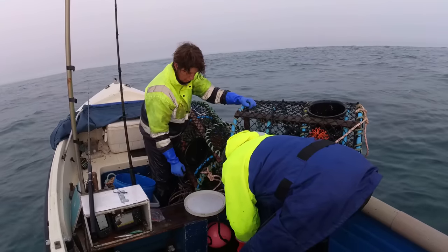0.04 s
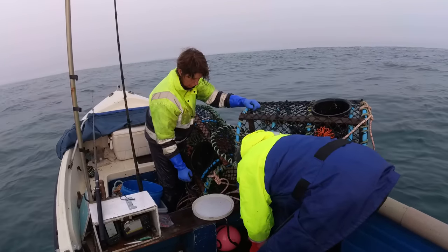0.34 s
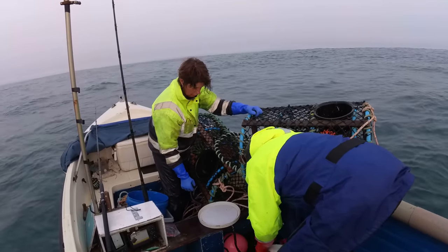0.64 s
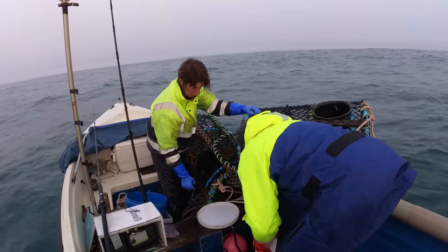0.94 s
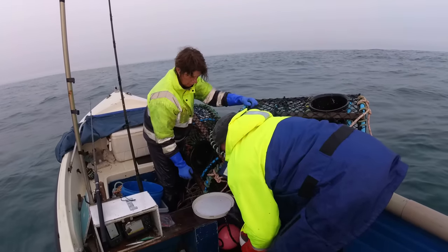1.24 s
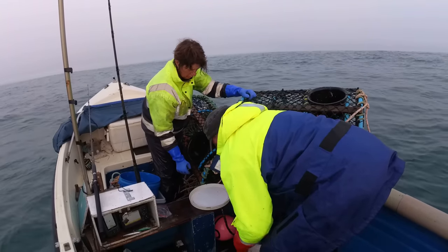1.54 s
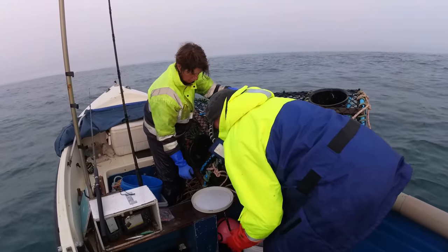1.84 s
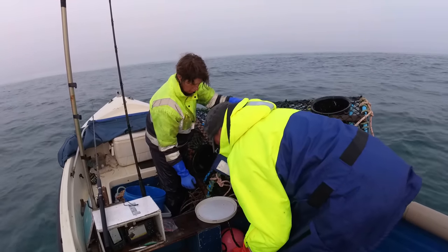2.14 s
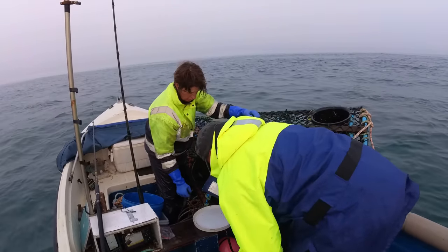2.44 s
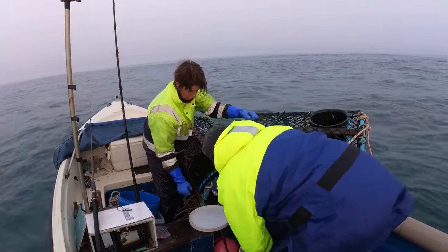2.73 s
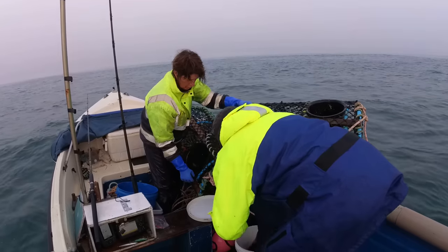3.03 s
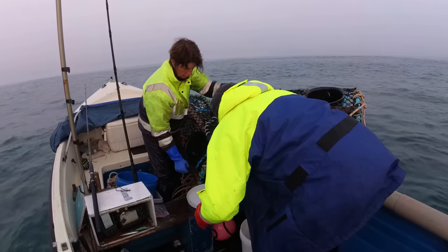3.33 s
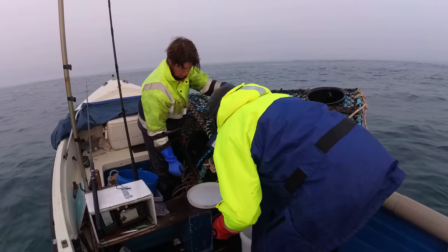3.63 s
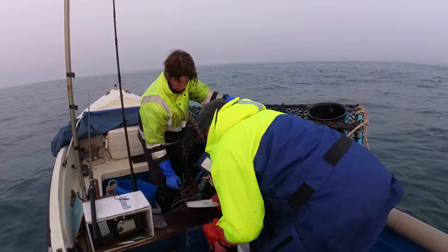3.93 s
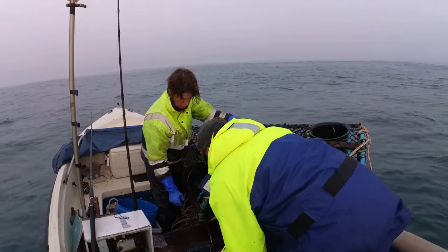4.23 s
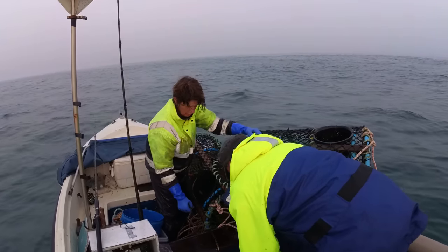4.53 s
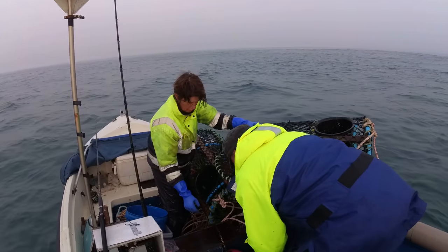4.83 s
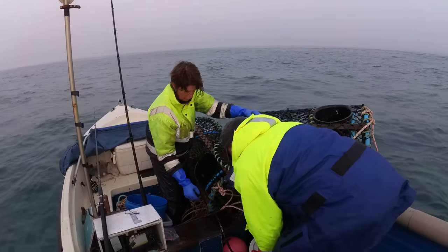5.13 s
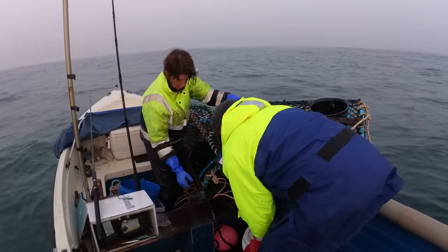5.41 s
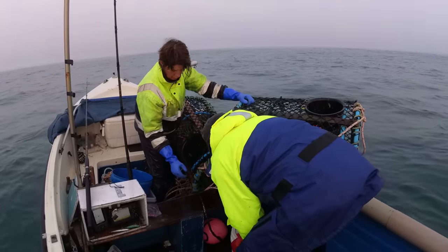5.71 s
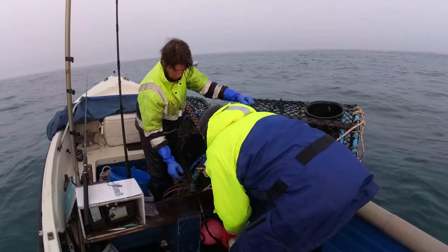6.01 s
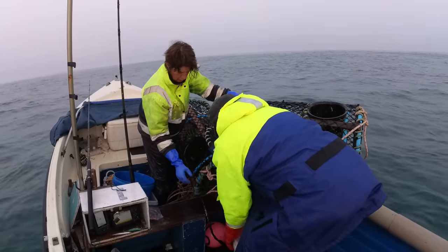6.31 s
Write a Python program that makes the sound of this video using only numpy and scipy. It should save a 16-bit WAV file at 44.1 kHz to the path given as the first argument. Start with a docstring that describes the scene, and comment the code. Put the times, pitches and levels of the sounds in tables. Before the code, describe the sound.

A small boat's hull rumbles low and steady throughout, with soft lapping water, a faintly jiggling fitting and a fine, chirring hiss on the right. A few tiny sharp snaps sound close on the right at the start and recur now and then. From about 0.6 to 1.3 seconds, lobster pots and gear are shifted, knocking and rattling while the hollow deck thumps beneath. A lull follows with scattered clinks and short clear plinks. Oilskins rustle briefly near 2.7 seconds and again near 3.9, with a few lighter knocks and clinks between, just after 3 seconds. From about 4.4 seconds until the end, a little past 6, the gear scrapes and lands in its heaviest run of blows, strongest near 4.5, 5.1 and 5.9 seconds, each with a dull deck boom. Low wind gusts buffet the microphone, growing somewhat in the second half.

```python
"""A small boat lies at sea by a stack of lobster pots: from the start the hull rumbles, water laps, a
fitting jiggles and a fine hiss chirrs on the right, where sharp snaps sound. Near one second, as wind
gusts rise, gear is shifted: impact and friction excite its modes, and the hollow deck booms beneath.
In the lull, clear plinks ring out and oilskins rustle; a few more knocks follow at three seconds.
From about 4.4 seconds to the end the gear scrapes and lands in its heaviest run of blows."""
import sys
import numpy as np
from scipy import signal
from scipy.fft import rfft, irfft, next_fast_len
from scipy.io import wavfile
from scipy.ndimage import map_coordinates

SR = 44100
rng = np.random.default_rng(int(sys.argv[2]) if len(sys.argv) > 2 else 0)


def pcm_store(signal):
    """Save signal as 16-bit PCM."""
    levels = np.round(np.clip(np.atleast_2d(signal), -1, 1) * 32767)
    wavfile.write(sys.argv[1], SR, levels.astype(np.int16).T)


N = 280476
TIME = np.arange(N) / SR

# Gear set down or shoved. Each row: start and contact length in seconds, levels of body, clack, crack
# and deck boom in dB, then the boom's centre, the piece's low note and its high ping in Hz.
KNOCKS = [(0.637, .012, -25.5, -30, -39, 1.5, 130, 586, 2420),
          (.829, 0.012, -31.5, -52, -46, -4, 151, 630, 1630),
          (.902, 0.0094, -20.5, -29.5, -26, -1.5, 128, 703, 2600),
          (1.079, 0.032, -20.5, -20.5, -28, -32, 150, 800, 2080),
          (1.11, 0.016, -20, -18.5, -27.5, -26, 151, 1140, 2420),
          (1.238, .0055, -24, -34, -48, -27, 149, 790, 2010),
          (1.25, 0.015, -22, -21, -27.5, -22, 150, 660, 2380),
          (3.107, 0.012, -31, -32.5, -46, -2, 141.3, 735, 2310),
          (3.138, 0.013, -33, -35, -59, -7, 116.5, 750, 2220),
          (3.253, .026, -32, -43, -54, -2, 127.5, 1130, 1600),
          (4.43, 0.012, -41, -30.5, -41, -8, 133, 990, 1900),
          (4.485, 0.0035, -14, -20.5, -33, -6, 176, 1120, 2180),
          (4.49, 0.0097, -16, -22.5, -37, 3, 177, 774, 2500),
          (4.588, 0.008, -17, -26.5, -34, -1.5, 160, 346, 2310),
          (5.081, 0.014, -18, -25.5, -39, -5.5, 151, 455, 2340),
          (5.095, 0.031, -16, -25.5, -35, 3, 145.6, 784, 2530),
          (5.125, 0.011, -15, -24, -31, 1, 135, 496, 3400),
          (5.244, .013, -22.5, -35.5, -39.5, -1, 164.4, 295, 2260),
          (5.358, 0.0041, -18, -35.5, -35.5, -6.5, 176, 694, 2680),
          (5.553, .012, -34, -36, -44, -8, 151, 600, 2280),
          (5.771, 0.0095, -19.5, -27, -24.5, 6, 130.4, 910, 2270),
          (5.831, 0.012, -34.5, -32, -37, -10, 103, 600, 2380),
          (5.853, 0.015, -33, -42, -39.5, -2, 87.5, 600, 2380),
          (5.88, 0.0046, -11, -16, -21, 5, 138.7, 760, 2400),
          (6.22, 0.011, -20.5, -25.5, -27, 3, 124, 567, 2580)]
# Gear sliding towards a blow. Each row: start and length in seconds, levels of body, clack and crack
# in dB, low note and high ping in Hz.
SLIDES = [(4.44, 0.033, -33.5, -34.5, -48, 1130, 2700), (4.543, 0.037, -31, -29.5, -42, 850, 3570),
          (5.049, 0.02, -32.5, -44, -49, 684, 2450), (5.315, 0.029, -36.5, -37, -47, 950, 1500),
          (5.758, 0.0081, -32, -33, -37, 726, 2870), (6.207, 0.013, -25.5, -40, -39, 450, 1190)]

def gear_contacts(touch_s=.011, rebound_s=0.019, rebound_loss_db=(12, 12, 13.5), slide_abruptness=.15):
    """Impact and friction: yields each blow with its weaker rebound, then the slides and the clinks."""
    for s, length, body, clack, crack, _, _, *pitches in KNOCKS:
        levels = np.array([body, clack, crack])
        yield 1, s, length, *levels, *pitches
        yield 1, s + length + rebound_s, touch_s, *(levels - rebound_loss_db), *pitches
    for slide in SLIDES:
        yield slide_abruptness, *slide
    band_centres_hz = np.array([850, 2130, 4200])   # body, clack, crack
    for s, _, hz, shake_db in CLINKS:
        levels = shake_db - 8 * np.abs(np.log2(band_centres_hz / hz))   # 8 dB less per octave away
        yield 1, s, touch_s, *levels, hz, hz


# Modes of the gear. Each row: frequency in Hz, relative level in dB, 60 dB decay time in seconds.
GEAR_MODES = [(312, 0, .06), (385, -7, .05), (453, -1, .085), (520, -5, .05), (640, -5, .04), (759, 8, .1),
              (845, 3, .07), (933, 1, .07), (1183, 1, .08), (1370, -4, .03), (1560, -8, .035),
              (1856, -3, .06), (2078, -4, .055), (2288, -2, .055), (2440, -3, .04), (2742, 2, .08),
              (2852, 2, .08), (3080, -3, .04), (3607, -3, .06), (4762, -3, .04), (5142, -4, .04),
              (5275, -3, .04), (5800, -3, .02)]

def struck_gear(note_t60=0.059, ping_t60=0.0069, echo_db=-6, echo_t60=0.049):
    """Modal resonance: contacts ring the gear, and the boat's sides scatter the sound to each ear."""
    out, t = np.zeros((2, N)), TIME[:SR // 4]
    for abruptness, s, length, body_db, clack_db, crack_db, note_hz, ping_hz in gear_contacts():
        impact = min((0.015 / length) ** 3, 5)   # a short contact is mostly impact, a long one a rasp
        force = chatter(t, length, impact, slips_per_s=2000, settle_s=0.048, abruptness=abruptness)
        scatter = rng.standard_normal((3, len(t))) * fade(t, echo_t60)
        scatter *= from_db(echo_db) / np.linalg.norm(scatter[0])
        # grip and point of contact change the strength of each mode
        modes = sum(resonance(force, hz, t60) * from_db(db + rng.normal(-1, 4.5))
                    for hz, db, t60 in GEAR_MODES)
        note = from_db(7) * resonance(force, note_hz, note_t60)
        ping = from_db(6) * resonance(force, ping_hz, ping_t60)
        direct = force + modes + note + ping
        echoes = signal.fftconvolve(scatter, direct[None], axes=1)[:, :len(t)]
        centre, sides = direct + echoes[2], echoes[:2]
        # light pieces, with more clack than body, are brighter and radiate less bass
        lightness = np.clip((clack_db - body_db + 4) / 4, 0, 1)
        body_lowpass = signal.butter(1, 650 * 4 ** lightness, fs=SR)
        clack_lowpass = signal.butter(1, 1500 * 2 ** lightness, fs=SR)
        body = band(signal.lfilter(*body_lowpass, centre + sides / 3), 240 * 2 ** lightness, 1330)
        clack = band(signal.lfilter(*clack_lowpass, centre + sides), 1315, 3360, order=6)
        crack = band(0.32 * direct + sides, 3200, 6280, order=4)
        gains = from_db(body_db), from_db(clack_db), from_db(crack_db) * stereo(-10, 0)
        for part, gain in zip((body, clack, crack), gains):
            add(out, s, part * gain / np.std(part[:, t < length + .008]))
    return out


# Modes of the deck. Each row: frequency in Hz, relative level in dB, 60 dB decay time in seconds.
DECK_MODES = [(85.6, 7, 0.049), (110.2, 3, 0.11), (151, 6, 0.068), (175.2, -4, 0.23)]

def deck_booms(push_s=0.013, fall_db_per_octave=38.5):
    """Damped vibration: a blow sets the hollow deck swinging, favouring modes near the boom's centre."""
    out, t = np.zeros(N), TIME[:SR // 2]
    for s, *_, boom_db, boom_hz, _, _ in KNOCKS:
        swing = np.zeros(len(t))
        for hz, db, t60 in DECK_MODES:
            gain = from_db(db - fall_db_per_octave * abs(np.log2(hz / boom_hz)))
            swing += gain * np.sin(2 * np.pi * hz * t) * fade(t, t60)
        add(out, s, from_db(boom_db) * swing * (1 - np.exp(-t / push_s)))
    return out


# Clinks and clanks of the gear, alone or within a blow. Each row: start in seconds, level in dB,
# nominal pitch in Hz, level of the shaking it starts in dB.
CLINKS = [(.652, -28, 2770, -44), (0.745, -38, 700, -25.5), (1.152, -20, 2770, -46),
          (1.166, -23, 2740, -45), (1.198, -24, 1260, -35), (1.287, -19.5, 2610, -39),
          (1.338, -26, 1900, -37), (1.481, -30, 2230, -38), (1.726, -31, 1900, -34.5),
          (1.87, -24, 1040, -29), (1.871, -32, 3000, -37), (2.855, -19.5, 2710, -36.5),
          (3.109, -19, 2450, -33), (3.11, -20.5, 4200, -43), (3.118, -24, 4260, -49),
          (3.128, -23, 2430, -47), (3.152, -28, 2750, -47), (3.183, -29, 1060, -28.5),
          (3.193, -25, 2640, -39), (3.254, -30, 5900, -37), (3.288, -18, 2760, -37.5),
          (3.429, -35, 3630, -39), (3.88, -25.5, 773, -25.5), (4.106, -29, 3730, -41.5),
          (4.485, -7.5, 1237, -20.5), (4.639, -28, 3270, -40), (4.731, -18.5, 2870, -39.5),
          (4.733, -19.5, 3770, -47), (4.742, -22, 2950, -51), (6.096, -24.5, 940, -33)]

def clinks(cycles=19, snap_db=-10, shadow_above_hz=3400):
    """Beating modes: a contact snaps and rings two close pitches; the highest favour the right ear."""
    out, t = np.zeros((2, N)), TIME[:SR // 10]
    for s, db, hz, _ in CLINKS:
        force = chatter(t, length=.003, impact=3, slips_per_s=900, settle_s=.04)
        pair = ring(force, hz * 0.865, cycles / hz) - ring(force, hz * 0.962, cycles / hz)
        snap = band(force, hz / 2, min(2 * hz, 11000), order=2)
        clink = peak_one(pair) + from_db(snap_db) * peak_one(snap)
        pan = np.array([[.25 if hz > shadow_above_hz else 1], [1]])
        add(out, s, pan * from_db(db) * clink)
    return out


# Sharp little snaps close by. Each row: start in seconds, peak level on the right in dB, pitch in Hz.
SNAPS = [(.153, -29, 7500), (.2848, -18.5, 5050), (.294, -32, 7200), (.396, -33, 5600), (0.9782, -23, 5900),
         (1.7222, -30, 6700), (2.3865, -36, 7300), (4.041, -27, 6700), (5.046, -34, 6000),
         (5.929, -20.5, 6500), (6.1973, -31, 7450), (6.262, -37, 7000)]

def snaps(ring_t60=0.0051, click_gain=2.224):
    """Impulse response: each snap is a single click with a heavily damped ring."""
    out, impulse = np.zeros(N), signal.unit_impulse(SR // 50)
    click = click_gain * band(impulse, 4200, 11000, order=2)
    for s, db, hz in SNAPS:
        add(out, s, from_db(db) * peak_one(ring(impulse, hz, ring_t60) + click))
    return out * stereo(-9, 0)


# Clear plinks near 1.3 and 1.5 kHz, like louder taps of the loose fitting. Each row: start in seconds,
# level of the note on the left in dB, starting pitch in Hz.
PLINKS = [(0.972, -28, 1520), (1.379, -29.5, 1510), (2.073, -38, 1226), (2.245, -30, 1270),
          (2.767, -28, 1294), (2.821, -25.5, 1260), (2.92, -24, 1256), (3.339, -23.5, 1263),
          (3.64, -29.5, 1480), (3.669, -42, 1270), (3.923, -34, 1294), (3.99, -30.5, 1520),
          (4.839, -31, 1550), (5.385, -26, 1490), (5.977, -30, 1380)]

def plinks(cycles=72, swell_s=0.00034, rise_per_s=6, burst_db=-7, burst_t60=.03):
    """Damped oscillation: with a tiny burst of noise, a clear note swells, rises a little and dies."""
    out, t = np.zeros(N), TIME[:SR // 10]
    for s, db, hz in PLINKS:
        phase = 2 * np.pi * hz * (t + rise_per_s * t * t / 2)
        note = np.sin(phase) * (1 - np.exp(-t / swell_s)) * fade(t, cycles / hz)
        burst = band(rng.standard_normal(len(t)) * fade(t, burst_t60), hz / 1.2, hz * 1.4, order=2)
        add(out, s, from_db(db) * (peak_one(note) + from_db(burst_db) * peak_one(burst)))
    return out * stereo(0, -8)


# Oilskins brushing. Each row: start and length in seconds, relative level at the crest in dB.
RUSTLES = [(2.66, 0.19, -43.5), (2.888, 0.049, -46), (3.846, 0.098, -39), (4.1, 0.078, -54),
           (4.3, 0.094, -50), (4.858, 0.14, -46)]

def oilskins(creases_per_s=2500, low_hz=3600, high_hz=6300):
    """Shot noise: as an arm moves, the tiny creases of stiff cloth merge into a swell."""
    out = np.zeros(N)
    creases = (rng.random(N) < creases_per_s / SR) * rng.standard_normal(N)
    cloth = rms_one(band(creases, low_hz, high_hz))
    for s, length, db in RUSTLES:
        swell = np.sin(np.pi * np.clip((TIME - s) / length, 0, 1)) ** 2
        out += from_db(db) * swell * cloth
    return out * stereo(-14, -2)


# Mode pairs of a loose fitting. Each row: centre in Hz, 60 dB decay time in seconds, left and right
# levels in dB.
FITTING_MODES = [(1270, 0.16, -48, -68), (1520, 0.19, -50.5, -63.5)]

def loose_fitting(taps_per_s=16):
    """Rattling: the boat's vibration taps a fitting unevenly, each tap dividing anew among its modes."""
    gaps_s = np.exp(.45 * rng.standard_normal(400)) / taps_per_s
    onsets = (np.cumsum(gaps_s) * SR).astype(int)
    onsets, out = onsets[onsets < N], np.zeros((2, N))
    for hz, t60, left_db, right_db in FITTING_MODES:
        tap_db = np.clip(rng.normal(0, 4, (400, 2)), -8, 6)
        taps = np.zeros((2, N))
        taps[:, onsets] = from_db(tap_db[:len(onsets)]).T
        pair = ring(taps[0], hz * .985, t60) + ring(taps[1], hz * 1.015, t60)
        out += rms_one(pair) * stereo(left_db, right_db)
    return out


# Colour of the rumble. Each row: frequency in Hz, relative spectral density in dB.
RUMBLE_SPECTRUM = [(18, -36), (30, -18.5), (42, -13), (56, -5.5), (70, 5.5), (92, 2), (145, 0), (205, 4.5),
                   (240, -2), (275, 2.5), (400, -3), (620, -11), (1200, -17), (2000, -27.5), (3100, -29),
                   (3600, -68.5)]
# Course of the rumble. Each row: time in seconds, relative level in dB.
RUMBLE_LEVEL = [(0.0, -31), (0.14, -31.5), (3.88, -30.5), (6.02, -30.5), (6.36, -31)]

def hull_rumble(flutter_db=0.91, apart_db=-12):
    """Partly coherent noise: the hull's fluttering rumble is nearly the same at both ears."""
    common = noise(RUMBLE_SPECTRUM) * from_db(flutter_db * drift(50))
    apart = from_db(apart_db) * noise(RUMBLE_SPECTRUM) * [[1], [-1]]
    return envelope(RUMBLE_LEVEL) * (common + apart) * stereo(1.1, 1.9)


# Course of the wind. Each row: time in seconds, level in dB about which the gusts wander.
WIND_LEVEL = [(0, -56), (.6, -46), (1.3, -40), (1.8, -56), (2.2, -38), (2.7, -48), (3.3, -41.5),
              (3.8, -42.5), (4.25, -36), (4.8, -36.5), (5.3, -35.5), (5.7, -44), (6.05, -30), (6.36, -38)]

def wind(low_hz=40, high_hz=80, gust_db=2, apart_db=-11):
    """Turbulence: gusts buffet the microphone with deep pressure noise, partly separate on each side."""
    common, apart = [rms_one(band(rng.standard_normal(N), low_hz, high_hz, order=2)) for _ in range(2)]
    gusts = envelope(WIND_LEVEL) * from_db(gust_db * drift(5.8))
    return gusts * (common + from_db(apart_db) * apart * [[1], [-1]])


def lapping(bubbles_per_s=260, low_hz=631, high_hz=1900, cycles=26, spread_db=5.5, pitch_count=24):
    """Bubble resonance: wavelets trap air at random, each bubble ringing at its own pitch; rms 1."""
    births = np.flatnonzero(rng.random(N) < bubbles_per_s / SR)
    strengths = from_db(spread_db * np.minimum(rng.exponential(1, len(births)), 3))
    strengths *= rng.choice([-1, 1], len(births))
    pitch_index, out = rng.integers(0, pitch_count, len(births)), np.zeros(N)
    for k, hz in enumerate(np.geomspace(low_hz, high_hz, pitch_count)):
        clicks = np.zeros(N)
        clicks[births] = strengths * (pitch_index == k)
        out += ring(clicks, hz, cycles / hz)
    return rms_one(band(out, low_hz / 2, high_hz * 2, order=2))


# Colour of the hiss. Each row: frequency in Hz, relative spectral density in dB.
HISS_SPECTRUM = [(1200, -20.5), (2200, 3), (3500, 6.5), (4300, 5), (5000, 7), (5900, 3.5), (7000, -4),
                 (8000, -11.5), (9000, -38.5)]
# Course of the hiss. Each row: time in seconds, relative level in dB.
HISS_LEVEL = [(0.0, -57), (0.51, -60), (0.8, -51.5), (1.04, -59.5), (1.66, -56.5), (2.43, -60), (2.71, -57),
              (4.16, -60.5), (4.549, -53.5), (4.84, -58), (5.26, -55), (5.6, -60), (5.95, -56),
              (6.36, -54.5)]

def hiss(flicker_db=1.9):
    """Amplitude modulation: fine noise, mostly on the right, flickers at random in level."""
    fizz = np.array([noise(HISS_SPECTRUM) for _ in range(2)]) * from_db(flicker_db * drift(8))
    return envelope(HISS_LEVEL) * fizz * stereo(-6, 10)


# A faint chirr. Each row: centre in Hz, typical squeaks per second, rms level on the right in dB.
CHIRR_BANDS = [(4260, 30, -54), (5770, 27, -59)]

def chirr(squeak_s=0.023, scatter_hz=42, width_hz=70, spread_db=3):
    """Line broadening: random phase roughens short squeaks, which run together into narrow bands."""
    out = np.zeros(N)
    for hz, per_s, db in CHIRR_BANDS:
        squeaks, s = np.zeros(N), 0
        jitter = np.cumsum(rng.standard_normal(N + SR)) * np.sqrt(2 * np.pi * width_hz / SR)
        for wait, pitch, size, stretch in np.clip(rng.standard_normal((300, 4)), -2, 1.5):
            s += np.exp(.55 * wait) / per_s
            if s < N / SR:
                t = TIME[:int(squeak_s * 2 ** (stretch / 2) * SR)]
                phase = 2 * np.pi * (hz + scatter_hz * pitch) * t + jitter[int(s * SR):][:len(t)]
                add(squeaks, s, from_db(spread_db * size) * np.sin(np.pi * t / t[-1]) * np.sin(phase))
        out += from_db(db) * rms_one(squeaks)
    return out * stereo(-16, 0)


def chatter(t, length, impact, slips_per_s, settle_s, spread_db=3, abruptness=1):
    """Stick-slip force: an impact, then uneven slips that build with the pressure and die away."""
    slips = (rng.random(len(t)) < slips_per_s / SR) * rng.choice([-1, 1], len(t))
    build = 4 * abruptness   # abruptness is 1 for a blow, less for a slide that swells up
    pressure = np.expm1(-build * t / length) / np.expm1(-build) * fade(t - length, settle_s)
    force = slips * from_db(spread_db * np.clip(rng.standard_normal(len(t)), -2, 2)) * pressure
    force[0] += impact * abruptness
    return force


def ring(force, hz, t60):
    """Damped oscillator: a unit impulse starts a sine of height 1."""
    r, w = 1000 ** (-1 / (t60 * SR)), 2 * np.pi * hz / SR
    return signal.lfilter([0, np.sin(w)], [1, -2 * r * np.cos(w), r * r], force + 1e-18)


def resonance(force, hz, t60):
    """Resonant band-pass: gain 1 at its peak, ringing down 60 dB in t60 seconds."""
    r, w = 1000 ** (-1 / (t60 * SR)), 2 * np.pi * hz / SR
    numerator = (1 - r * r) / 2 * np.array([1, 0, -1])
    return signal.lfilter(numerator, [1, -2 * r * np.cos(w), r * r], force + 1e-18)


def band(x, low_hz, high_hz, order=3):
    """Causal band-pass filtering."""
    return signal.sosfilt(signal.butter(order, [low_hz, high_hz], "band", fs=SR, output="sos"), x)


def noise(spectrum):
    """Spectral shaping: steady noise of a given colour, rms 1."""
    hz, db = np.transpose(spectrum)
    size = next_fast_len(N)
    bin_hz = np.arange(size // 2 + 1) * SR / size
    gain = from_db(np.interp(np.log(1 + bin_hz), np.log(hz), db))
    return rms_one(irfft(rfft(rng.standard_normal(size)) * gain, size)[:N])


def drift(rate_hz, hop=40):
    """Low-passed noise: a slow random wander of rms 1."""
    r = np.exp(-2 * np.pi * rate_hz * hop / SR)
    slow = signal.lfilter([1], [1, -2 * r, r * r], rng.standard_normal(N // hop + 2002))[2000:]
    return np.interp(np.arange(N) / hop, np.arange(len(slow)), rms_one(slow))


def fade(t, t60):
    """Exponential decay: 60 dB in t60 seconds, from time zero on."""
    return np.exp(-np.log(1000) * np.maximum(t, 0) / t60)


def envelope(points):
    """Gain interpolated through points of time in seconds and level in dB."""
    return from_db(np.interp(TIME, *np.transpose(points)))


def from_db(db):
    """Decibels to amplitude ratio."""
    return 10 ** (np.asarray(db) / 20)


def stereo(left_db, right_db):
    """Level panning: one gain for each ear."""
    return from_db([[left_db], [right_db]])


def rms_one(x):
    """Normalisation to rms 1."""
    return x / np.sqrt(np.mean(x ** 2) + 1e-20)


def peak_one(x):
    """Normalisation to peak 1."""
    return x / np.abs(x).max()


def add(out, s, sound):
    """Superposition: mix a sound in at s seconds."""
    at = int(s * SR)
    out[..., at:at + sound.shape[-1]] += sound[..., :N - at]


def scene(left_lag_s=0.00015):
    """Superposition and path delay: the sources sum and reach the right side just before the left."""
    mix = struck_gear() + deck_booms() + clinks() + snaps() + plinks() + oilskins()
    mix += loose_fitting() + chirr() + hull_rumble()
    mix += np.array([lapping(), lapping()]) * stereo(-45, -46)
    left, right = mix + hiss() + wind()
    return np.array([map_coordinates(left, [np.arange(N) - left_lag_s * SR], order=3), right])


def record(dry, low_cut_hz=39, high_cut_hz=8900, ceiling=.88):
    """Band limiting and soft saturation: deep bass is cut, tall peaks are rounded, treble is cut."""
    x = signal.sosfilt(signal.butter(3, low_cut_hz, "high", fs=SR, output="sos"), dry)
    rounded = x / (1 + (x / ceiling) ** 4) ** .25
    return signal.sosfilt(signal.ellip(8, .3, 70, high_cut_hz, fs=SR, output="sos"), rounded)


dry = scene()
out = record(dry)
pcm_store(out)
```